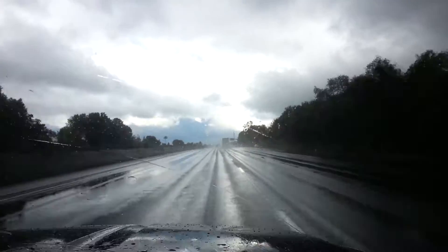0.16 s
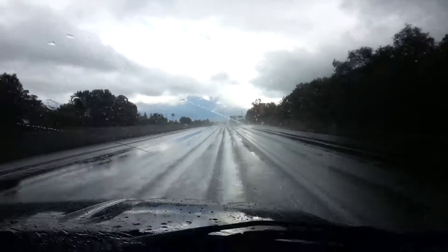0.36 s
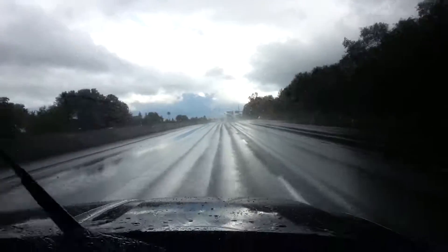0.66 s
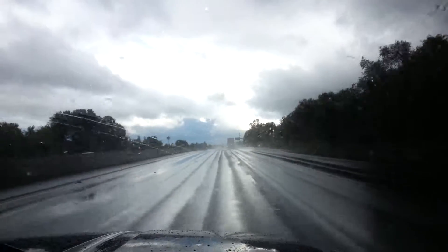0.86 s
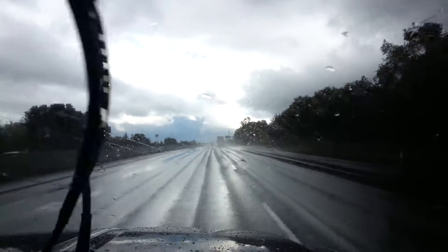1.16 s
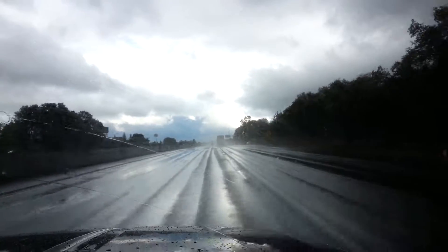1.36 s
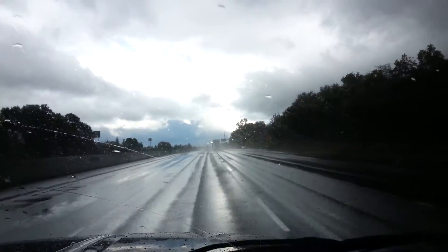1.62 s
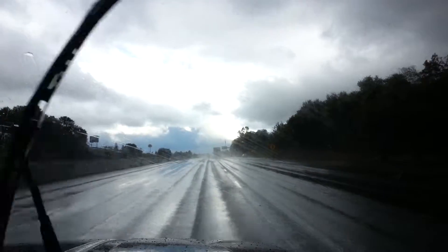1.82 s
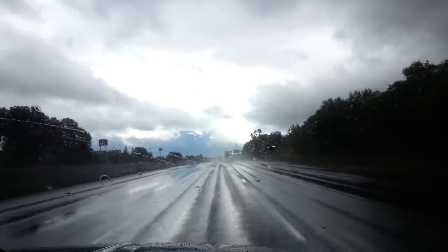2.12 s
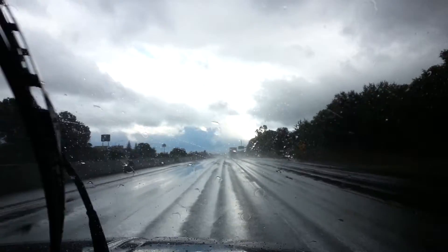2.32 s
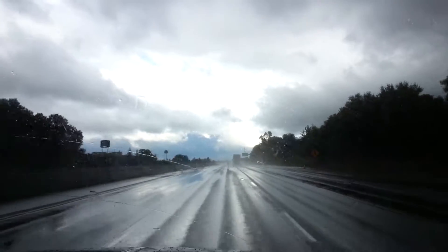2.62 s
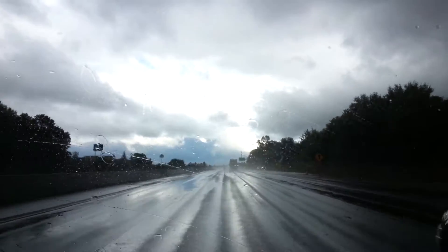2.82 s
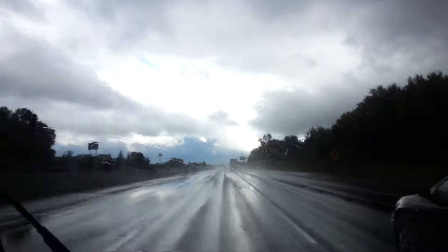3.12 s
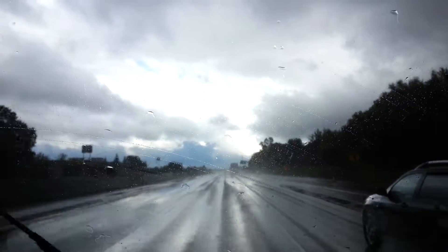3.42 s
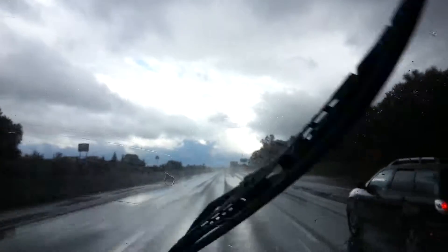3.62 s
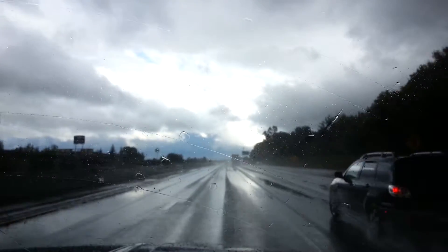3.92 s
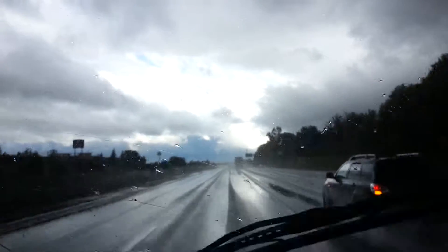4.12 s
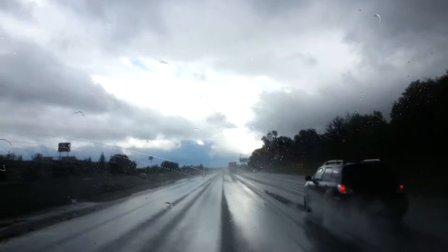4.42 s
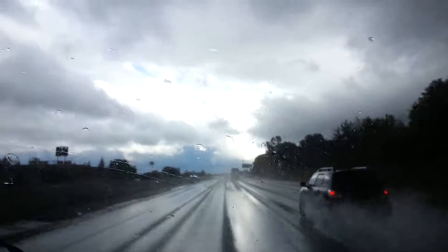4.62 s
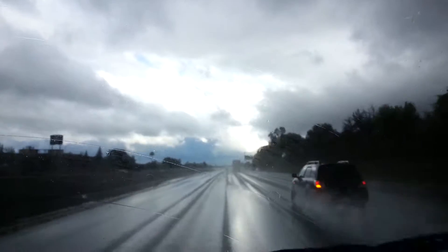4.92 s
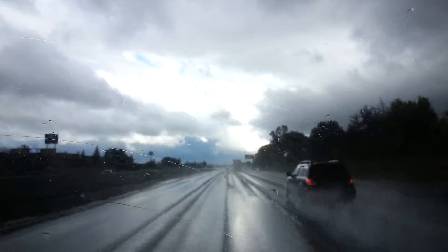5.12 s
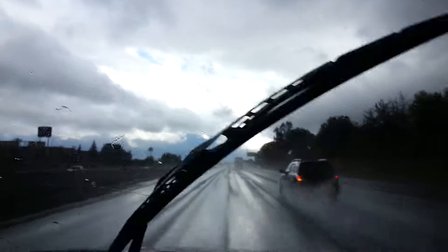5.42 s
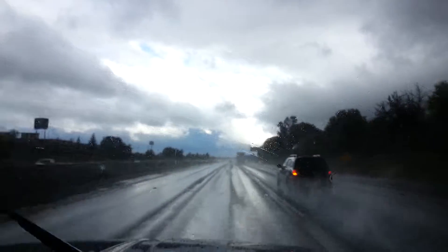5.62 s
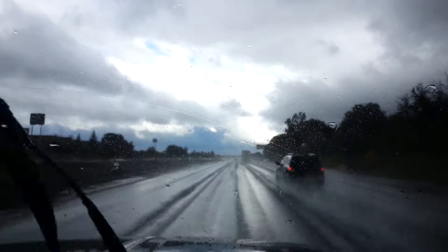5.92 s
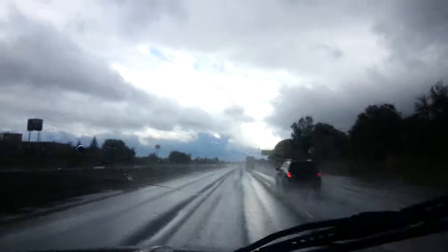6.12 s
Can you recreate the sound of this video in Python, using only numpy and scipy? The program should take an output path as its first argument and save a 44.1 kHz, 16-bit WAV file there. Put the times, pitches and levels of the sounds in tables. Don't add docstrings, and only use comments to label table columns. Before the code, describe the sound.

From inside a truck cab at steady highway speed, small raindrops patter on the windshield so densely they become a crisp hiss, with fat drops tapping out sharply. Underneath, a deep tyre rumble, wind roar and a constant engine hum fill the cab. Wiper linkage thuds dully about every 1.2 seconds, with smaller knocks between. Close stereo microphones give wide, airy rain and a centred bass.

```python
import sys
import numpy as np
from scipy import signal
from scipy.fft import rfft, irfft, next_fast_len
from scipy.io import wavfile

SR = 44100
rng = np.random.default_rng(int(sys.argv[2]) if len(sys.argv) > 2 else 0)


def dump_mix(stems):
    frames = np.atleast_2d(stems).T
    limited = np.clip(frames, -1, 1)
    pcm = np.round(limited * 32767).astype(np.int16)
    wavfile.write(sys.argv[1], SR, pcm)


def elevation(decibels):
    levels = np.asarray(decibels, float)
    return 10 ** (levels / 20)


N = 276066

# [f/Hz, level/dB]
MIC_LIKENESS = [(60, 0.89), (110, 1), (200, 0.9), (380, 0.77), (700, 0.24), (1290, -0.36), (2380, 0.059),
                (4400, 0.00011), (8120, 0.002), (15000, -0.13)]
MIC_LEAN = [(60, 0), (92, 1), (140, 0), (210, 1), (330, -0.5), (500, 0), (770, -1), (1170, 0), (1790, 2),
            (2740, 2), (4190, 7.5), (6410, 3), (9810, -6.5), (15000, -1.5)]
SIDES = np.array([[1], [-1]])

# [multiple of firing rate, rms level/dB, wobble/dB, right lag/rad]
ENGINE_ORDERS = [(1, -37, 1, 0.19), (1.5, -45, 2, 0.17), (2, -31.5, 2.4, 0.21), (2.5, -38, 2, 0.96),
                 (3, -34.5, 0, 0.43)]
FIRING_HZ = 112.5

# [f/Hz, level/dB per Hz]
RUMBLE_SPECTRUM = [(18, -85), (33, -50), (50, -15.5), (103, -3.5), (167, -1.5), (216, -0.5), (269, -3),
                   (335, -3), (385, -9), (480, -17.5), (620, -41), (1060, -120)]
ROAR_SPECTRUM = [(240, -35), (400, -1.5), (543, -0.5), (678, -5), (768, -3.5), (977, -10), (1200, -7.5),
                 (1390, -13.5), (1900, -19), (2470, -26), (4180, -120)]
# [t/s, level/dB]
CAB_SHAKE = [(0.0, -23), (0.6, -22), (1.15, -22.5), (1.4, -21.5), (1.7, -21.5), (1.99, -20), (2.11, -19.5),
             (2.7, -23), (3.19, -23), (3.38, -21), (3.8, -23.5), (4.11, -21.5), (5.02, -23), (5.4, -23),
             (5.74, -23), (5.98, -21), (6.26, -21.5)]
ROAR_DB, ROAR_FOLLOWS = -29.5, 0.65

# [f/Hz, level/dB, t60/s]
COWL_MODES = [(143, -7, 0.062), (196.6, -2.5, 0.11), (219, -0.5, 0.049), (295, -5, 0.059), (347, 3.5, 0.02),
              (443, -0.5, 0.034), (520, -5.5, 0.018), (656, -6.5, 0.031), (822, -11, 0.053),
              (1150, -3, 0.009), (1910, -13.5, 0.012)]
# [peak level/dB, brightness/dB, depth/dB]
WIPER_SLAMS = [
    (-13, -17, 4),
    (-10, -16, 2),
    (-5.5, -20, -2),
    (-11.5, -11, 2.5),
    (-7, -12, 2),
]
# [t/s, peak level/dB, brightness/dB, depth/dB]
COWL_KNOCKS = [(0.397, -21.5, -0.5, 7), (1.311, -10, -13, 4), (1.36, -11.5, -19, 2.5),
               (2.045, -8.5, -46, -2), (2.24, -21, -8, 7), (2.62, -12, -27, -6), (2.69, -15, -30, -2),
               (2.745, -17.5, -27, 6.5), (0.55, -22, -25, 6), (5.46, -22, -25, 8),
               (5.245, -8.5, -14, -4), (5.89, -16.5, -23, 10)]
SWEEP_START_S, SWEEP_S = 0.976, 1.2205
JUDDER_S, JUDDER_LEAD_S = 0.044, 0.0038
STOP_AFTER_S, STOP_WIDTH_S = 0.024, 0.00047

# [t/s, level/dB]
RAIN_STRENGTH = [(0.0, -30.5), (0.21, -34.5), (0.42, -31.5), (0.62, -32.5), (0.85, -34.5), (1.03, -34.5),
                 (1.4, -32), (1.83, -33.5), (2.21, -31.5), (2.51, -34.5), (3.4, -33.5), (3.57, -35.5),
                 (5.2, -37), (5.4, -35.5), (5.63, -36.5), (6.03, -34.5), (6.26, -39.5)]
# [f/Hz, level/dB per Hz]
SPRAY_SPECTRUM = [(880, 2.5), (1500, 2.5), (1620, -7), (2470, 7.5), (4750, 3.5), (5890, -10), (9420, -18.5),
                  (12700, -35), (14500, -23), (14900, -42), (15500, -72)]
GLASS_SPECTRUM = [(880, -15), (1500, -4), (2070, -1.5), (2470, 0), (4750, 1.5), (6070, -11.5), (7980, -12),
                  (14100, -30), (14900, -37), (15500, -52)]
GUST_DB = 1.6
TREBLE_HZ, TREBLE_SWING_DB, TREBLE_PER_S = 9200, 3.5, 6

# [t/s, peak level/dB, left-right/dB]
FLECKS = [(0.0598, -32, -6), (0.0877, -32, -4.0), (0.1126, -19, 4), (0.4703, -20, -2.0), (0.5432, -22, 0),
          (0.5841, -17, -1.0), (0.6379, -30, -0.5), (1.1902, -20, -2), (1.5299, -30, 0),
          (1.5768, -35, -1.5), (1.5943, -19, -1.5), (1.6916, -22, -4), (1.7459, -26, -8), (1.9959, -20, 2),
          (2.0802, -18, -1.0), (2.1136, -18, -1.5), (2.2313, -32, -2.5), (2.2533, -20, -7),
          (2.3261, -33, -1.5), (2.3391, -21, 0.0), (2.3785, -30, -4), (2.4967, -28, 7), (2.5805, -17, 2),
          (2.6005, -18, 3), (2.6174, -22, 0), (2.6923, -32, -1.5), (2.7112, -27, 4), (2.8883, -23, -0.5),
          (3.0096, -25, -2.5), (3.1428, -31, -1.0), (3.1827, -41, 1.5), (3.2794, -34, -2.0),
          (3.2984, -24, -7), (3.5887, -38, 0.0), (3.8028, -30, -2.0), (3.8487, -21, -6), (3.9265, -23, -8),
          (4.0726, -32, -3), (4.1225, -23, 1), (4.1734, -35, -2.5), (4.2218, -34, -1.5), (4.3221, -20, 4),
          (4.4558, -33, -2.5), (4.5126, -36, -0.5), (4.5855, -27, -4), (5.0265, -37, -10), (5.1013, -22, 4),
          (5.1532, -23, 1), (5.1921, -19, 1), (5.2599, -39, 0.0), (5.3916, -20, 2), (5.466, -37, -4),
          (5.5672, -24, -2.5), (5.7159, -37, 2.0), (5.7613, -42, -4), (5.7763, -22, 2), (6.1484, -38, -3.5),
          (6.1614, -25, -4.5), (6.1843, -36, -1.5), (6.1963, -24, 1.5)]
PRICKS = [(0.0144, -35, -4), (0.2493, -39, -7.5), (0.3356, -39, -2.5), (0.3611, -38, -1.5),
          (0.5551, -32, -3.5), (0.6569, -35, -2.5), (0.6814, -33, -1.0), (0.7033, -33, -3.5),
          (0.7272, -34, 1), (0.8709, -29, -1), (1.0735, -29, -2.0), (1.1054, -36, -4.5),
          (1.3493, -35, -5.5), (1.3977, -38, -4.0), (1.4227, -37, -4.0), (1.6601, -40, -4),
          (1.7818, -37, -4.0), (1.8751, -34, -4.5), (1.9829, -39, -2), (2.168, -34, 0.0),
          (2.3655, -39, 0.0), (2.6688, -46, -0.5), (2.7327, -37, -3.0), (3.0505, -30, -3.5),
          (3.0949, -31, -7.0), (3.257, -37, -2.5), (3.476, -38, -2.0), (3.5139, -38, -3.5),
          (3.7354, -44, -6.5), (3.7554, -36, -6.5), (3.8262, -39, -8.5), (3.8671, -36, -19),
          (3.8995, -39, -10), (3.9794, -45, -7.5), (4.5735, -42, -9), (4.7152, -45, -10),
          (4.7371, -40, 12.0), (4.7454, -50, -4.5), (4.7676, -51, -5.5), (4.7835, -36, -6.5),
          (4.7985, -31, 5.0), (4.8194, -49, -8.5), (4.8399, -50, -4.5), (4.8618, -43, -5.5),
          (4.9142, -43, 6), (4.9222, -43, -3.0), (5.0609, -34, -11), (5.2789, -42, -2.0),
          (5.5288, -39, -5.5), (5.6186, -35, -6.0), (5.7259, -28, 0.5), (5.8421, -40, -9.5),
          (5.8865, -34, -12), (5.9638, -37, -4.5)]
# [f/Hz, level/dB per Hz]
FLECK_SPECTRUM = [(2000, -26), (4700, 4), (6500, -2), (10000, -7.5), (14300, -8), (15400, -23),
                  (15800, -60)]
PRICK_SPECTRUM = [(4000, -30), (7000, -1), (10000, -2), (14500, -1), (15000, -10), (15900, -40)]
FLECK_RISE_S, FLECK_T60_S, FLECK_DB = 0.00041, 0.014, -6.5
PRICK_RISE_S, PRICK_T60_S, PRICK_DB = 0.0003, 0.0095, -3.5
STRAY_COUNT, STRAY_OVER_RAIN_DB, STRAY_SPREAD_DB, STRAY_LEAN_DB = 300, -13, 5, 11

# [f/Hz, level/dB, t60/s]
PANE_MODES = [(2160, -5, 0.011), (2420, 2, 0.013), (2900, -2, 0.013), (3230, -17, .01), (4400, -4, .01),
              (4680, -3, 0.013)]
# [t/s, peak level/dB, upper modes/dB]
HEAVY_DROPS = [
    (5.1922, -15, 4),
    (4.7, -29, -3),
    (5.3263, -16, -5),
    (5.3385, -25, 3),
    (5.2835, -30, 7),
    (5.198, -24, 0),
]

# [t/s, peak level/dB, brightness/dB, ring f/Hz]
FAT_DROPS = [(0.0873, -15, -21, 3620), (0.2948, -19, -15, 4480), (0.6384, -18, -17, 3060),
             (0.7273, -16.5, -14, 3530), (1.079, -17, -9, 4480), (1.3982, -16.5, -20, 3600),
             (1.4154, -17, -19, 4080), (1.5783, -21, -23, 3590), (1.6023, -15.5, -18, 2940),
             (1.6921, -15, -18, 2850), (1.8622, -15.5, -25, 4370), (2.0583, -14, -26, 3780),
             (2.1964, -15, -8, 3140), (2.2546, -19, -10, 2540), (2.4054, -15.5, -15, 2690),
             (2.6179, -19, -8, 4610), (2.8694, -19.5, -18, 3010), (3.1532, -15, -27, 3310),
             (3.2987, -18, -20, 4310), (3.8024, -18.5, -21, 4480), (3.932, -18, -17, 4650),
             (3.9597, -18, -35, 2450), (4.0733, -17, -9, 4480), (4.6523, -15, -17, 1970),
             (4.9791, -21, -22, 4820), (5.1923, -9, -18, 4770), (5.3263, -26, -38, 2400),
             (5.637, -15, -24, 4570), (5.857, -19, -20, 1800), (5.868, -17.5, -14, 1890),
             (6.178, -18.5, -18, 2460)]
BURST_N = 2048
PLACE_DB, PLACE_SPREAD_DB = 1, 3
GLASS_LOW_HZ, GLASS_HIGH_HZ = 2450, 4770
MIDDLING_COUNT, MIDDLING_OVER_RAIN_DB, MIDDLING_SPREAD_DB = 40, 10.5, 2.5
MIDDLING_BRIGHT_DB, BRIGHT_SPREAD_DB = -15, 5


def rms_one(x):
    return x / np.sqrt(np.mean(x ** 2) + 1e-20)


def at_hz(points, hz):
    points = np.array(points)
    return np.interp(np.log(hz + 1), np.log(points[:, 0]), points[:, 1])


def in_time(curve):
    s, level = np.transpose(curve)
    return np.interp(np.arange(N) / SR, s, level)


def drift(rate_hz):
    r = np.exp(-2 * np.pi * rate_hz * 40 / SR)
    noise = rng.standard_normal(N // 40 + 2002)
    slow = signal.lfilter([1], [1, -2 * r, r * r], noise)[2000:]
    return np.interp(np.arange(N) / 40, np.arange(len(slow)), rms_one(slow))


def ring(push, hz, t60_s):
    r = np.exp(-np.log(1000) / (t60_s * SR))
    w = 2 * np.pi * hz / SR
    return signal.lfilter([0, np.sin(w)], [1, -2 * r * np.cos(w), r * r], push + 1e-18)


def hiss(spectrum, size, count=1):
    hz = np.arange(size // 2 + 1) * SR / size
    noise = rfft(rng.standard_normal((count, 2, size)))
    mid, side = noise.transpose(1, 0, 2)[:, :, None]
    alike = np.clip(at_hz(MIC_LIKENESS, hz), -1, 1)
    pair = np.sqrt(1 + alike) * mid + np.sqrt(1 - alike) * side * SIDES
    return pair * elevation(at_hz(spectrum, hz) + at_hz(MIC_LEAN, hz) * SIDES / 2), hz


def steady(spectrum, flicker_db, rate_hz):
    size = next_fast_len(N)
    noise = irfft(hiss(spectrum, size)[0][0], size)[:, :N]
    return noise / np.std(noise.mean(axis=0)) * elevation(flicker_db * drift(rate_hz))


def engine():
    turn = 2 * np.pi * np.cumsum(FIRING_HZ * (1 + 0.002 * drift(0.79))) / SR
    out = 0
    for multiple, level_db, wobble_db, lag_rad in ENGINE_ORDERS:
        phase = multiple * turn + rng.uniform(0, 2 * np.pi) - lag_rad * (SIDES < 0)
        level = np.sqrt(2) * elevation(level_db + wobble_db * drift(2.8))
        out = out + level * np.sin(phase)
    return out


def road_and_wind():
    shake_db = in_time(CAB_SHAKE)
    roar_db = ROAR_DB + ROAR_FOLLOWS * (shake_db - shake_db.mean())
    rumble = elevation(shake_db - 2.0) * steady(RUMBLE_SPECTRUM, 0.27, 9.3)
    roar = elevation(roar_db - 0.3) * steady(ROAR_SPECTRUM, 0.43, 3.9)
    return rumble + roar


def wipers():
    t = np.arange(N) / SR
    deep, low, high, blow = np.zeros((4, N))
    slams = [(SWEEP_START_S + k * SWEEP_S, *slam) for k, slam in enumerate(WIPER_SLAMS)]
    for s, peak_db, bright_db, depth_db in slams + list(COWL_KNOCKS):
        age = 2 * np.clip(t - s + JUDDER_LEAD_S, 0, None) / JUDDER_S
        judder = np.sqrt(age) * np.exp(0.5 - age / 1.14)
        blow += np.exp(-((t - s - STOP_AFTER_S) / STOP_WIDTH_S) ** 2)
        deep += elevation(peak_db + depth_db) * judder
        low += elevation(peak_db) * judder
        high += elevation(peak_db + bright_db + 12.5) * judder
    out = 0
    for hz, level_db, t60_s in COWL_MODES:
        mid, side = rng.standard_normal((2, N))
        width = np.clip(hz / 1500, 0, 1)
        shake = mid + blow * rng.choice([-1, 1]) + width * side * SIDES
        strength = deep if hz < 260 else low if hz < 580 else high
        out = out + elevation(level_db - 33.5) * ring(shake * strength, hz, t60_s)
    return signal.sosfilt(signal.butter(2, 110, "high", fs=SR, output="sos"), out)


def puffs(rows, spectrum, rise_s, t60_s, gain_db):
    t = np.arange(BURST_N) / SR
    envelope = (1 - np.exp(-t / rise_s)) * elevation(-60 * t / t60_s)
    bursts = irfft(hiss(spectrum, BURST_N, count=len(rows))[0]) * envelope
    out = np.zeros((2, N + BURST_N))
    for (s, peak_db, lean_db), puff in zip(rows, bursts):
        start = int(s * SR)
        level = elevation(peak_db + gain_db + 0.46 * lean_db * SIDES)
        out[:, start:start + BURST_N] += level * puff / np.abs(puff.mean(axis=0)).max()
    return out[:, :N]


def flecks(rain_db):
    fine = puffs(FLECKS, FLECK_SPECTRUM, FLECK_RISE_S, FLECK_T60_S, FLECK_DB)
    sharp = puffs(PRICKS, PRICK_SPECTRUM, PRICK_RISE_S, PRICK_T60_S, PRICK_DB)
    when = rng.random(STRAY_COUNT)
    size, lean = rng.standard_normal((STRAY_COUNT, 2)).T
    peak_db = rain_db[(when * N).astype(int)] + STRAY_OVER_RAIN_DB + STRAY_SPREAD_DB * size
    rows = np.transpose([when * N / SR, peak_db, STRAY_LEAN_DB * lean])
    return fine + sharp + puffs(rows, PRICK_SPECTRUM, PRICK_RISE_S, PRICK_T60_S, 0)


def splashes(ring_hz, bright_db, ring_db, t60_s):
    colour, hz = hiss(GLASS_SPECTRUM, BURST_N, count=len(ring_hz))
    bump_db = ring_db * np.exp(-(np.log((hz + 1) / ring_hz[:, None]) / 0.19) ** 2)
    colour = colour * elevation(bump_db + bright_db[:, None] * (hz > 5700))[:, None]
    t = np.arange(BURST_N) / SR
    low_share = 1 / (1 + (hz / 3300) ** 4)
    low_decay = elevation(-60 * t / (1.94 * t60_s))
    high_decay = elevation(-60 * t / t60_s) + elevation(-13.0 - 60 * t / (4.7 * t60_s))
    low = irfft(colour * low_share) * (1 - np.exp(-t / 0.00078)) * low_decay
    high = irfft(colour * (1 - low_share)) * (1 - np.exp(-t / 0.001)) * high_decay
    bursts = low + high
    return bursts / np.abs(bursts.mean(axis=1)).max(axis=1)[:, None, None]


def patter(per_s, spread_db, gust_db, count=14):
    sizes = elevation(spread_db * np.minimum(rng.exponential(1, N), 4.0)) * rng.choice([-1, 1], N)
    born = rng.random(N) < per_s * elevation(gust_db * drift(22.0)) / SR
    spot = rng.integers(0, count, N)
    size = next_fast_len(N + BURST_N)
    spot_hz = np.geomspace(2200, 9000, count)
    answers = splashes(spot_hz, np.full(count, 1.5), ring_db=0.5, t60_s=0.013)
    total = 0
    for k in range(count):
        hits = sizes * born * (spot == k)
        total = total + rfft(hits, size) * rfft(answers[k], size)
    total = irfft(total, size)[:, :N]
    return total / np.std(total.mean(axis=0))


def swaying_treble(rain):
    treble = signal.sosfiltfilt(signal.butter(2, TREBLE_HZ, "high", fs=SR, output="sos"), rain)
    return rain + treble * (elevation(TREBLE_SWING_DB * drift(TREBLE_PER_S)) - 1)


def dense_rain(rain_db):
    drops = elevation(-2.0) * patter(560, 2.07, GUST_DB)
    spray = elevation(-5.0) * steady(SPRAY_SPECTRUM, 0.46, 26.0)
    return elevation(rain_db) * swaying_treble(drops + spray)


def heavy_drops():
    t = np.arange(N) / SR
    out = 0
    for hz, level_db, t60_s in PANE_MODES:
        push = 0
        for s, peak_db, upper_db in HEAVY_DROPS:
            age = np.clip(t - s, 0, None) * hz / 2.5
            push = push + elevation(peak_db + upper_db * (hz > 3300)) * age * np.exp(1 - age)
        rough = push * np.sign(rng.standard_normal((2, N)))
        rough = signal.lfilter([0.5, 0.5], [1], rough)
        lean = elevation(at_hz(MIC_LEAN, hz) * SIDES / 2)
        out = out + elevation(level_db - 17.5) * lean * ring(rough, hz, t60_s)
    return out


def middling_drops(rain_db):
    when, pitch = rng.random((MIDDLING_COUNT, 2)).T
    size, shine = rng.standard_normal((MIDDLING_COUNT, 2)).T
    peak_db = rain_db[(when * N).astype(int)] + MIDDLING_OVER_RAIN_DB + MIDDLING_SPREAD_DB * size
    bright_db = MIDDLING_BRIGHT_DB + BRIGHT_SPREAD_DB * shine
    ring_hz = GLASS_LOW_HZ * (GLASS_HIGH_HZ / GLASS_LOW_HZ) ** pitch
    return np.transpose([when * N / SR, peak_db, bright_db, ring_hz])


def fat_drops(drops):
    s, peak_db, bright_db, ring_hz = np.transpose(drops)
    bursts = splashes(ring_hz, 0.66 * (bright_db + 16.0), ring_db=5.0, t60_s=0.014)
    place_db = PLACE_DB + PLACE_SPREAD_DB * rng.standard_normal(len(s))
    out = np.zeros((2, N + BURST_N))
    for start, level_db, lean_db, burst in zip((s * SR).astype(int), peak_db, place_db, bursts):
        out[:, start:start + BURST_N] += elevation(level_db - 4.0 + lean_db * SIDES / 2) * burst
    return out[:, :N]


def scene():
    rain_db = in_time(RAIN_STRENGTH)
    cab = engine() + road_and_wind() + wipers()
    rain = flecks(rain_db) + dense_rain(rain_db)
    drops = heavy_drops() + fat_drops(middling_drops(rain_db)) + fat_drops(FAT_DROPS)
    return cab + rain + drops


def roll_off(x):
    return signal.sosfilt(signal.butter(12, 15720, fs=SR, output="sos"), x)


def record(dry):
    rounded = 2.61 * np.tanh(dry / 2.405)
    return roll_off(rounded)


dry = scene()
out = record(dry)
dump_mix(out)
```